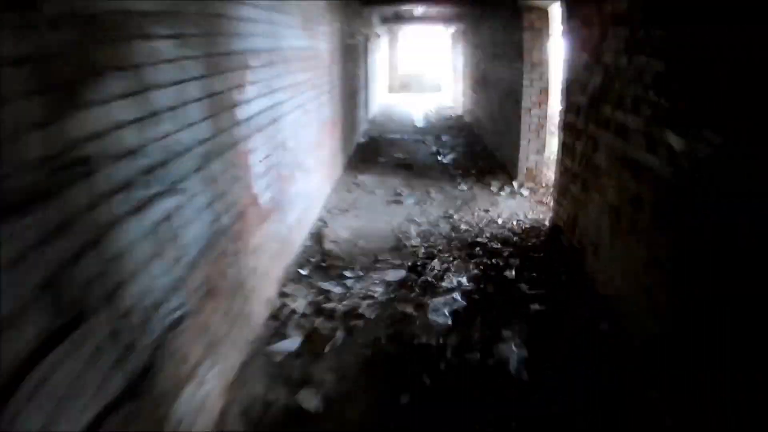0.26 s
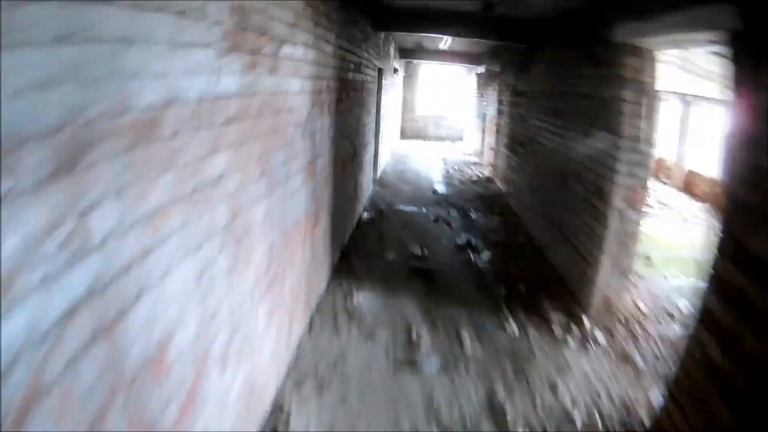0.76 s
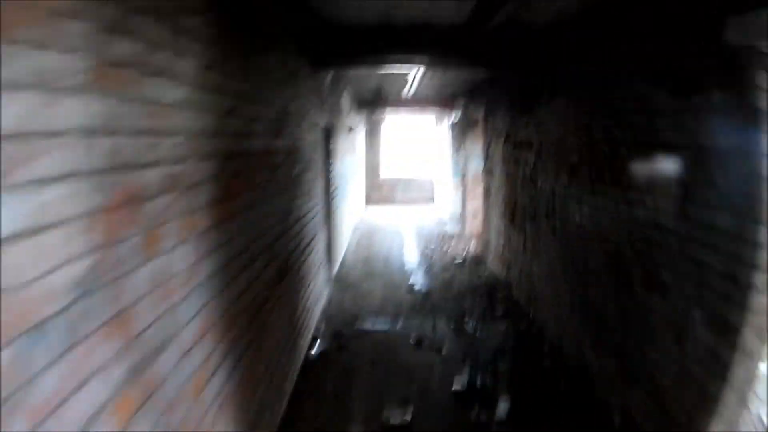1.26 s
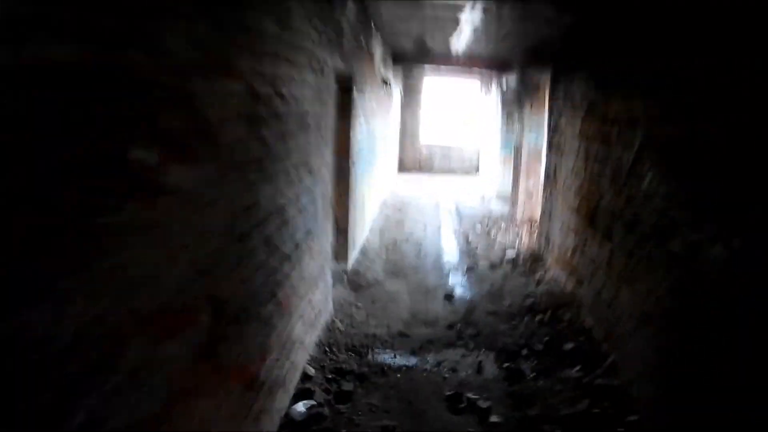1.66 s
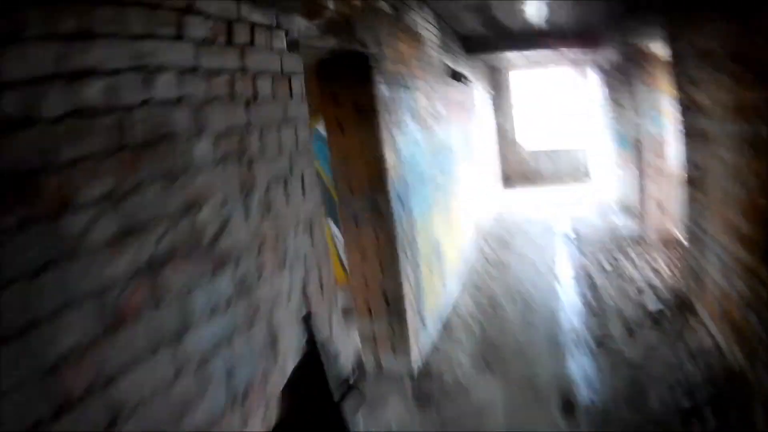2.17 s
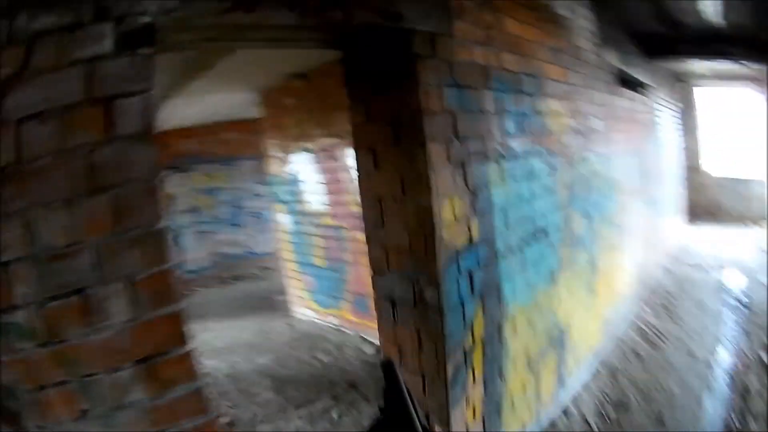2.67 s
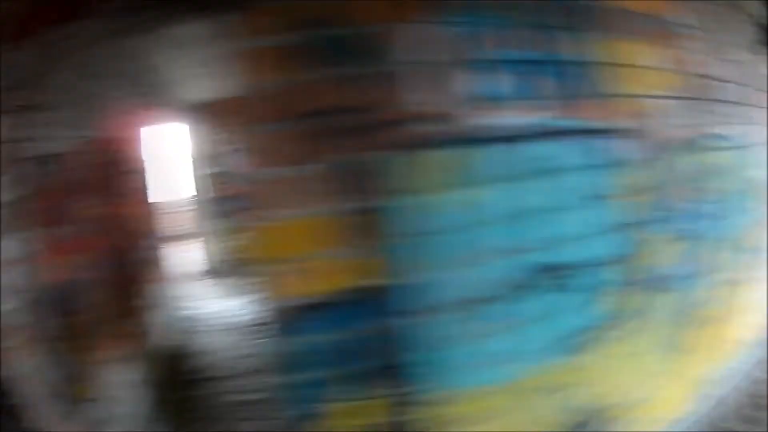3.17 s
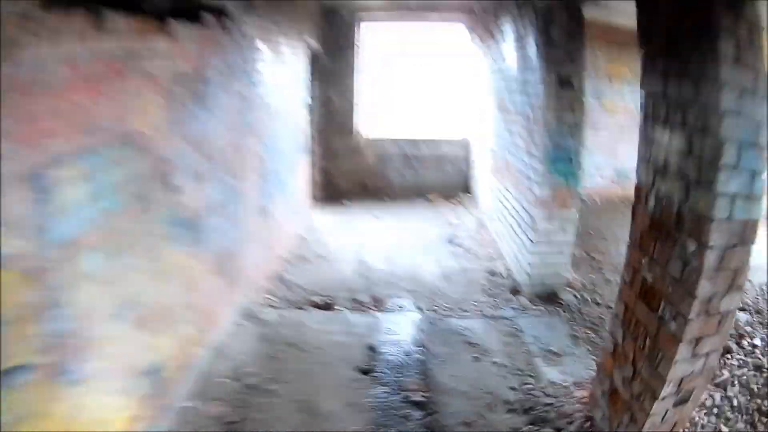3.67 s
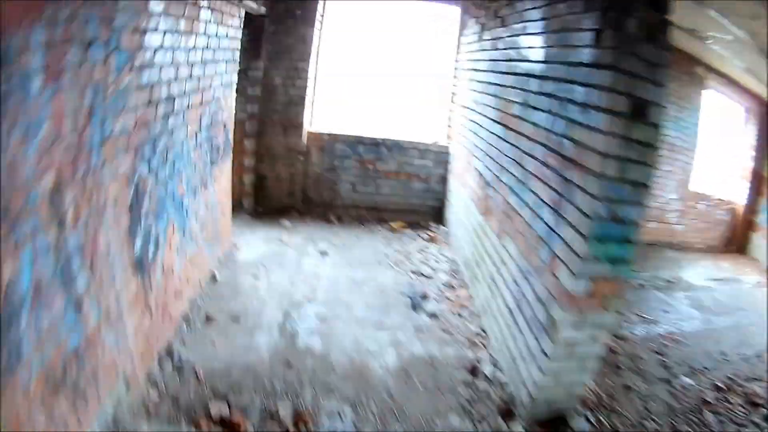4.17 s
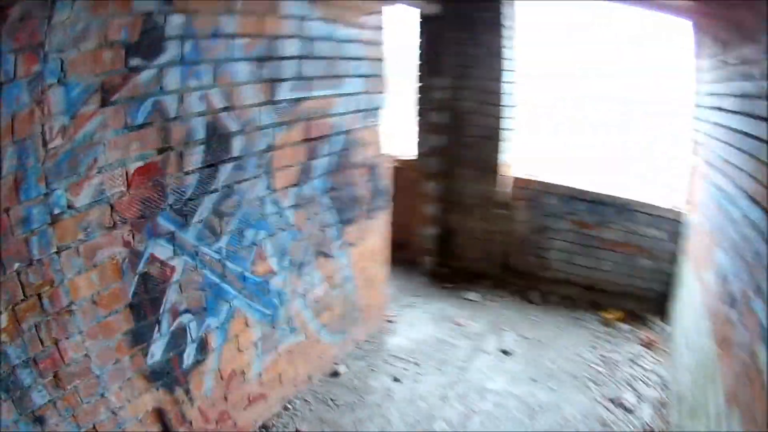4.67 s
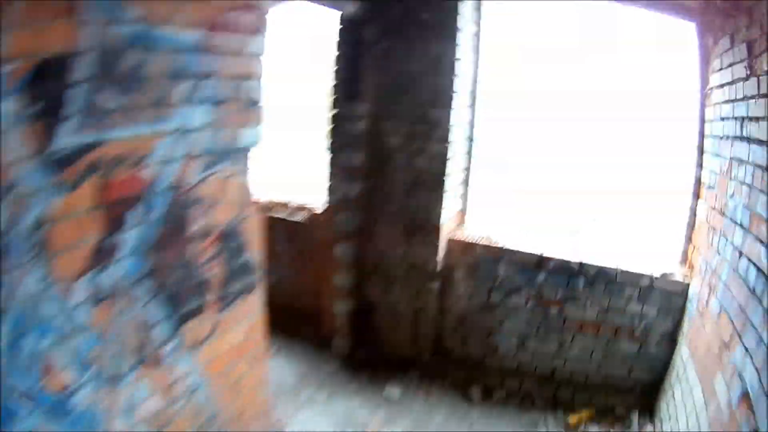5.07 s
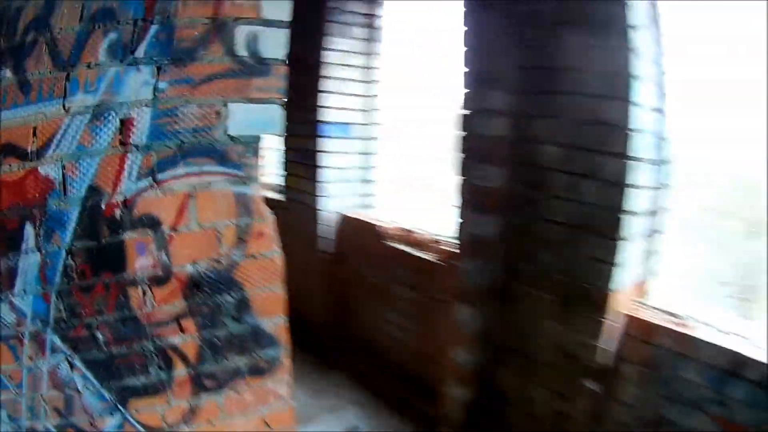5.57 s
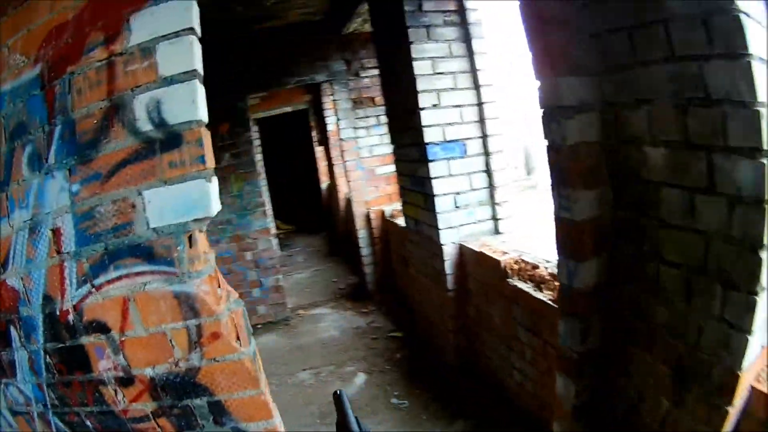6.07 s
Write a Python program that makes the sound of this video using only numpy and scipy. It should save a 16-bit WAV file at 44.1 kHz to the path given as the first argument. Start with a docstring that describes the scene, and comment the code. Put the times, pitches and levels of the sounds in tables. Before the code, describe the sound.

Close, boxy sound from a camera in a closed case worn by a runner inside a derelict brick building. From 0 to 2.3 seconds, running footfalls land roughly every 0.35 to 0.4 seconds, each a deep double thud of heel and toe, mostly with a dry crack of rubble. The hardest fall near 1.9 and 2.2. Between them, thin ticks of loose gear and short scrapes of sole and cloth. From 2.5 the pace breaks: weaker, duller steps around 2.6, 3.0, 3.25 and 3.45, with soft rustle and almost no ticks. Gentle, spaced steps follow near 3.85, 4.2 and 4.6, with small scuffs. At 5.03 a strong stomp with a sharp crunch, then cloth drags and a lighter step at 5.4. Afterwards only fading rustle and a faint rub near 6.2 remain, until 6.3. Low uneven air rumble and steady soft hiss lie underneath; very little room echo.

```python
"""Low footfall thuds with rubble cracks, thin ticks and cloth rustle, over a low air rumble and microphone hiss.
A runner crosses a rubble-strewn concrete corridor, slows and stops, with a camera in a closed case on the body.
Thuds are decaying low modes jolted by heel and toe; cracks and ticks of loose gear are short noise bursts.
Rustle and drags are friction grains mixed with smooth noise. Bursts and friction pass through the resonances
of the case; rumble and hiss are shaped noise."""
import sys
import numpy as np
from scipy import signal
from scipy.fft import rfft, irfft
from scipy.io import wavfile
from scipy.ndimage import uniform_filter1d

SR = 44100
rng = np.random.default_rng(int(sys.argv[2]) if len(sys.argv) > 2 else 0)


def master_out(mix):
    """Clip the mix to full scale and print it as 16-bit PCM to the path in sys.argv[1]."""
    frames = np.transpose(np.atleast_2d(mix))
    ceiling = np.clip(frames, -1, 1)
    pcm = np.round(ceiling * 32767).astype(np.int16)
    wavfile.write(sys.argv[1], SR, pcm)


N = 278182


def gain_of(db):
    """Amplitude factor of a level in dB."""
    return 10 ** (np.asarray(db) / 20)


def evened(x):
    """Scale to rms 1."""
    return x / np.sqrt(np.mean(x ** 2) + 1e-20)


def follow(s, values):
    """Straight lines through (time in seconds, value) points, one value per sample."""
    return np.interp(np.arange(N) / SR, s, values)


def add(mix, start_s, sound):
    """Mix a sound in place, cut off at the end of the scene."""
    part = mix[max(round(start_s * SR), 0):][:len(sound)]
    part += sound[:len(part)]


def coloured(points):
    """Noise of rms 1 with the given spectrum, interpolated in dB over log frequency."""
    point_hz, point_db = np.transpose(points)
    hz = np.fft.rfftfreq(N, 1 / SR)
    spectrum_db = np.interp(np.log(hz + 1), np.log(point_hz + 1), point_db)
    white = rng.standard_normal(N)
    return evened(irfft(rfft(white) * gain_of(spectrum_db), N))


def smooth_noise(width):
    """Slow random curve of rms 1: noise averaged twice over width samples."""
    return evened(uniform_filter1d(uniform_filter1d(rng.standard_normal(N), width), width))


def resonate(x, peaks):
    """A sum of steep fixed resonances, scaled so that white noise keeps its rms."""
    t = np.arange(1024) / SR
    ring = np.zeros(len(t))
    for hz, width_hz, db in peaks:
        envelope = t * np.exp(-np.pi * width_hz * t)
        ring += gain_of(db) * width_hz ** 1.5 * envelope * np.sin(2 * np.pi * hz * t)
    return signal.oaconvolve(x, ring / np.linalg.norm(ring))[:len(x)]


def through_case(drive, level_db, dull_db, upper_db, top_db, top_peaks):
    """One excitation reaches the microphone by four groups of resonances."""
    # Resonances, the first group being air in the case. Each row: centre in Hz, width in Hz, weight in dB.
    air_peaks = [(1506, 305, 0), (1658, 675, -0.5)]
    dull_peaks = [(374, 430, 4), (623, 322, 0), (762, 377, -1.5)]
    upper_peaks = [(1915, 600, -2), (2140, 320, -5), (2620, 1350, -11.5)]
    groups = [(air_peaks, level_db), (dull_peaks, dull_db), (upper_peaks, upper_db), (top_peaks, top_db)]
    return sum(gain_of(db) * resonate(drive, peaks) for peaks, db in groups)


def background():
    """A lumpy rumble that follows the motion, and steady hiss."""
    # Rumble level of motion and air. Each row: time in seconds, level in dB.
    sway = [(0.0, -51.5), (0.2, -59), (2.1, -59), (2.32, -55), (3.03, -58), (3.45, -56), (3.6, -60.5),
            (5.2, -60), (5.47, -59.5), (5.81, -60.5), (6.3, -59.5)]
    # Spectra of rumble and hiss. Each row: frequency in Hz, relative density in dB.
    rumble_spectrum = [(8.8, -25), (15, 6), (91, 1.5), (118, -4), (237, -12), (368, -28), (400, -39),
                       (520, -57), (880, -120)]
    hiss_spectrum = [(88, -39), (150, -1), (586, -8.5), (659, -10), (1090, -15.5), (1460, -16.5),
                     (2840, -24), (3190, -25), (7970, -32.5), (14900, -32), (15800, -23.5)]
    hiss_db, lump_db = -66, 0.82
    level_db = follow(*np.transpose(sway)) + lump_db * smooth_noise(2500)
    rumble = gain_of(level_db) * coloured(rumble_spectrum)
    return rumble + gain_of(hiss_db) * coloured(hiss_spectrum)


def effort():
    """Levels in dB of the four resonance groups: cloth plus drags that set in, swell or fade, and stop."""
    # Background rustle of cloth. Each row: time in seconds, level in dB.
    cloth = [(0, -68), (0.35, -71), (0.9, -71), (1.12, -71.5), (1.35, -73.5), (2.1, -67), (2.8, -75.5),
             (3.6, -70), (4.05, -74.5), (4.8, -73), (5.45, -68.5), (5.9, -75), (6.3, -75)]
    # Drags of sole and cloth. Each row: start in seconds, length in seconds, level in dB,
    # swell along the drag in dB, then dull, upper and bright parts in dB over the level.
    scuffs = [(0.03, 0.25, -63, -7.5, -0.5, -13, -12.5), (0.43, 0.079, -57, -7, 0.5, -9, -15.5),
              (0.6, 0.1, -64.5, -2, -2, -7, -9.5), (0.8, .1, -62, -15, 7.5, -5, -10),
              (1.2, 0.061, -65, -3.5, 4, -11, -13.5), (1.46, 0.032, -65.5, 1, -1, -9, -14),
              (1.58, 0.37, -70.5, 9, -7, -18, -12), (1.919, 0.095, -59, -11.5, 6.5, -15, -9),
              (2.24, 0.14, -65.5, -13.5, 4.5, -10, -9.5), (2.43, .13, -68, -3.5, 2, -9, -13),
              (2.605, 0.053, -58, 5, -5.5, -8, -18.5), (2.73, 0.042, -64, -11, -1, -8, -15),
              (2.95, 0.19, -69.5, 0, -15, -22, -15), (3.151, 0.081, -68, 6, -0.5, -8, -16),
              (3.26, 0.077, -69.5, 3, -1, -14, -9.5), (3.391, 0.048, -62.5, 1, 5, -7, -31),
              (3.46, .08, -72, -4, 11.5, -9, -15), (3.74, 0.134, -66, 4, -4, -22, -10.5),
              (4.239, 0.097, -59.5, -11.5, -2, -6, -5.5), (4.44, .12, -67, -1.5, 0, -13, -11),
              (4.61, 0.095, -69.5, -3.5, 4, -9, -11), (5.05, 0.11, -60, -8.5, 4.5, -11, -15.5),
              (5.189, 0.092, -64, -6, -3, -15, -12.5), (5.354, 0.1, -57, -14, -1, -10, -9.5),
              (5.53, .3, -70, -2, -9, -8, -11), (6.17, 0.056, -69.5, -1, 8.5, -11, -15)]
    dull_db = -70.5
    upper_over_cloth_db, bright_over_cloth_db = -12.5, -13
    rise_s, fall_db_per_s = 0.011, 702

    t = np.arange(N) / SR
    cloth_db = follow(*np.transpose(cloth))
    cloth_levels_db = [cloth_db, dull_db + 0 * t, cloth_db + upper_over_cloth_db, cloth_db + bright_over_cloth_db]
    power = gain_of(cloth_levels_db) ** 2
    for start_s, length_s, db, swell_db, *over_db in scuffs:
        fall_db = fall_db_per_s * np.maximum(t - start_s - length_s, 0)
        swelled_db = db + swell_db * np.clip((t - start_s) / length_s, 0, 1)
        shape = np.clip((t - start_s) / rise_s, 0, 1) * gain_of(swelled_db - fall_db)
        power = power + (gain_of([0, *over_db])[:, None] * shape) ** 2
    return 10 * np.log10(power)


def rustle():
    """Clumped grains of friction mixed with a smooth, slightly stronger scrape, heard through the case."""
    # Thin walls under rubbing. Each row: centre in Hz, width in Hz, weight in dB.
    bright_peaks = [(3145, 790, 17), (3660, 1200, 9)]
    grains_per_s, scrape_gain, clump_db = 700, 1.11, 2.04
    size = gain_of(1.4 * np.minimum(rng.exponential(1, N), 4))
    present = rng.random(N) < grains_per_s / SR
    grains = size * present * rng.choice([-1, 1], N)
    friction = evened(grains) + scrape_gain * rng.standard_normal(N)
    drive = evened(friction * gain_of(clump_db * smooth_noise(500)))
    return through_case(drive, *effort(), bright_peaks)


def taps():
    """Rubble cracks and gear ticks: a sharp tick and a short spray of noise, with a faint tail from the walls."""
    # Cracks of rubble under the sole. Each row: start in seconds, level in dB,
    # dull part in dB over the level, upper part in dB over the level, spray t60 in seconds.
    cracks = [(0.0395, -53, 3.5, -7, 0.038), (0.0785, -60, 5.5, -6, .074), (0.8064, -44.5, 1.5, -4, 0.037),
              (0.846, -52.5, -7, -8, 0.042), (1.1976, -43, -1, -7, 0.03), (1.2134, -53, 11.5, 8, 0.011),
              (1.5575, -53.5, 4.5, -10, 0.059), (1.5717, -55, 13.5, 2, 0.045), (1.9108, -49, -2, -2, 0.054),
              (1.9248, -39, 6, -2.5, 0.039), (2.2265, -43, 5.5, -36, 0.023),
              (2.2431, -44.5, 5.5, -6, 0.047), (2.604, -56, 13.5, -4, 0.028),
              (3.0121, -45.5, 10, -11, 0.022), (3.244, -55, 13.5, -22, 0.035),
              (3.4276, -58, 15, 0.5, 0.032), (3.8493, -61.5, 5, -20, .065), (4.197, -61.5, 11.5, -5, 0.095),
              (4.6164, -59, 8.5, -16, 0.055), (4.6592, -67.5, 13, -11, .03), (5.026, -47, 2.5, -13, 0.049),
              (5.0474, -37, 6, 2.5, 0.015), (5.3649, -59, 2.5, -11, .061)]
    # Thin ticks of loose gear. Each row: start in seconds, level in dB, bright part in dB over the level.
    ticks = [(0.2152, -47.5, -20), (0.3267, -45.5, -15.5), (0.607, -47, -21.5), (0.7092, -44.5, -15.5),
             (0.9024, -58, -17), (1.001, -47.5, -17.5), (1.0893, -56.5, -24), (1.114, -56, -22),
             (1.3536, -62, -21), (1.4092, -47.5, -14.5), (1.4632, -55.5, -28), (1.696, -62, -27),
             (1.7657, -47.5, -15), (1.9032, -55, -1), (2.0395, -53, -23), (2.107, -48.5, -17.5),
             (2.145, -58, -21), (2.3473, -53, -7), (2.385, -61, -7.5), (2.448, -59, -25),
             (4.2477, -48, -16), (5.2052, -58, -29)]
    # Thin walls under a sharp tick. Each row: centre in Hz, width in Hz, weight in dB.
    snap_peaks = [(3010, 220, -2.5), (4160, 560, 0), (6800, 840, -10)]
    crack_bright_db = -25.5  # over the level
    tick_dull_db, tick_upper_db, tick_t60_s = -30, -17, 0.024
    bite_s = 0.00073  # the spray takes this long to set in
    tail_db, tail_t60_s = -16, 0.12

    out, t = np.zeros(N), np.arange(SR // 5) / SR
    rows = [(s, db, dull_db, upper_db, crack_bright_db, t60_s) for s, db, dull_db, upper_db, t60_s in cracks]
    rows += [(s, db, tick_dull_db, tick_upper_db, bright_db, tick_t60_s) for s, db, bright_db in ticks]
    bite = np.minimum(t / bite_s, 1)
    tail = gain_of(tail_db - 60 * t / tail_t60_s)
    for start_s, db, *over_db, t60_s in rows:
        spray = gain_of(-60 * t / max(t60_s, 0.005))
        drive = rng.standard_normal(len(t)) * bite * (spray + tail)
        drive[0] -= 5  # the sharp tick
        add(out, start_s, gain_of(db) * through_case(drive, 0, *over_db, snap_peaks))
    return out


def jolts():
    """Heel and toe jolt the low modes: each dips in pressure at the same instant, swings back and dies away."""
    # Jolts of heel and toe. Each row: deepest push in seconds,
    # then levels in dB of the heave, mount, strap and knock modes.
    jolt_rows = [(0.043, -30.5, -37.5, -39.5, -45.5), (0.083, -30, -48, -42, -50),
                 (0.442, -30, -44, -45.5, -48.5), (0.486, -33, -35.5, -50, -56),
                 (0.8074, -29, -31, -48, -37.5), (0.8466, -30.5, -44, -40.5, -43.5),
                 (0.872, -58, -40.5, -64, -58), (1.201, -33, -28.5, -59, -42.5),
                 (1.2314, -65, -59, -43.5, -50), (1.268, -40.5, -43, -47.5, -53),
                 (1.562, -28, -31, -59, -51), (1.592, -49, -55, -40, -45), (1.911, -24, -26, -43.5, -41.5),
                 (1.931, -46, -39, -30.5, -29.5), (2.232, -26, -30, -43, -46),
                 (2.2497, -52, -42, -30.5, -37.5), (2.297, -34, -48, -46, -67),
                 (2.4922, -38, -67, -63, -60), (2.526, -44, -63, -66, -56), (2.604, -60, -69, -47, -55),
                 (3.012, -60, -60, -46.5, -64), (3.2453, -59, -65, -51.5, -73),
                 (3.4538, -44.5, -66, -49.5, -48), (3.796, -39, -62, -50, -61),
                 (3.874, -43, -41.5, -63, -56.5), (4.203, -38.5, -45.5, -63.5, -58),
                 (4.24, -42.5, -77, -50, -74), (4.617, -37, -41, -45.5, -54.5),
                 (4.6895, -42, -44, -59.5, -63), (5.033, -26, -33.5, -48, -52),
                 (5.053, -53, -24.5, -27.5, -28), (5.3699, -33.5, -43.5, -50, -56),
                 (5.402, -44, -52, -58, -58)]
    # Modes; heave is the body bouncing. Each row: nominal frequency in Hz, dB over the jolt's level, t60 in seconds.
    heave = [(35.9, 2.5, 0.19)]
    mount = [(62.26, -2.5, 0.33)]
    strap = [(89.6, 5, 0.19)]
    knock = [(142, 1.5, 0.22), (208, 4.5, 0.02), (302, -9.5, 0.092)]
    lead_s, detune_spread = 0.02, 0.014

    out = np.zeros(N)
    t = np.arange(SR // 2) / SR - lead_s
    for push_s, *levels_db in jolt_rows:
        for modes, level_db in zip([heave, mount, strap, knock], levels_db):
            for hz, db, t60_s in modes:
                detuned_hz = hz * (1 + detune_spread * rng.standard_normal())
                # builds up over most of a cycle
                rise = np.sin(np.pi / 2 * np.clip((t * hz + 0.4) / 0.8, 0, 1)) ** 2
                decay = gain_of(db + level_db - 60 * t / t60_s)
                add(out, push_s - lead_s, -decay * rise * np.cos(2 * np.pi * detuned_hz * t))
    return out


def scene():
    """Sum of all layers, one channel."""
    return (background() + rustle() + taps() + jolts())[None]


def record(dry):
    """The band limit: a steep low-pass."""
    edge_hz = 15780
    lowpass = signal.firwin(1023, edge_hz, window=("kaiser", 9), fs=SR)
    return signal.oaconvolve(dry, lowpass[None], "same")


dry = scene()
out = record(dry)
master_out(out)
```